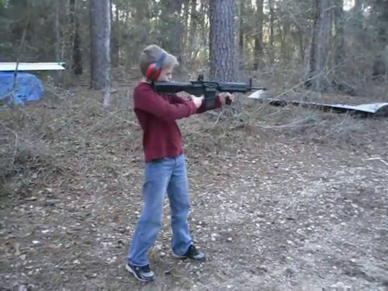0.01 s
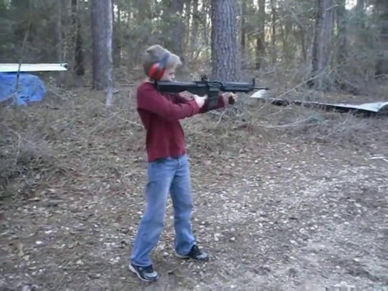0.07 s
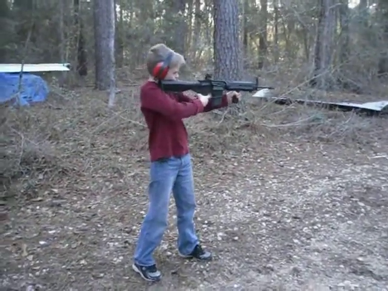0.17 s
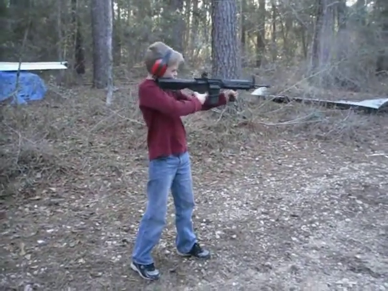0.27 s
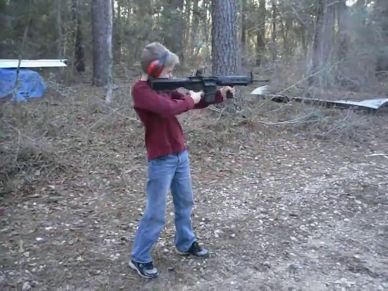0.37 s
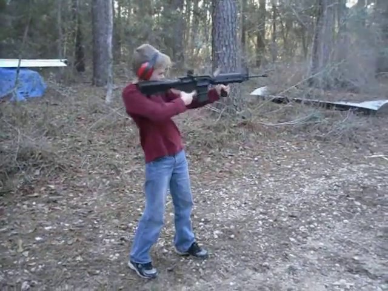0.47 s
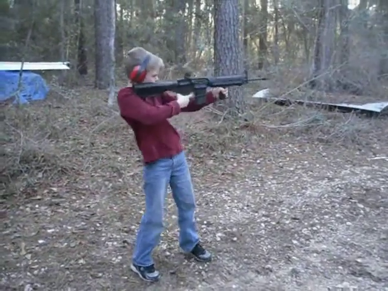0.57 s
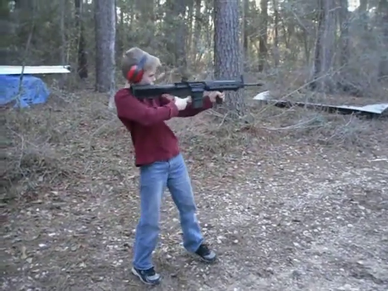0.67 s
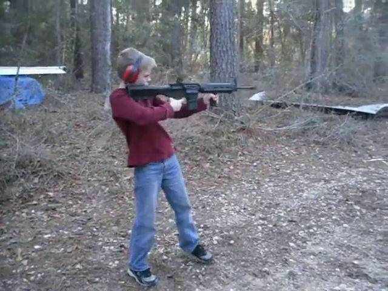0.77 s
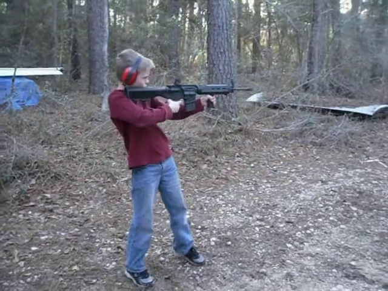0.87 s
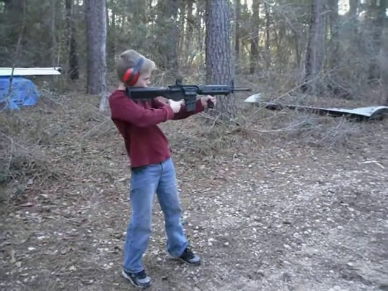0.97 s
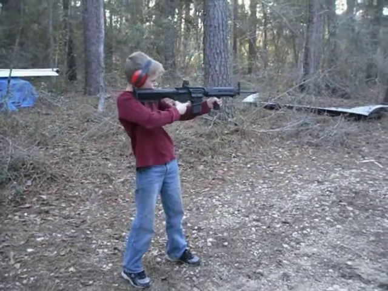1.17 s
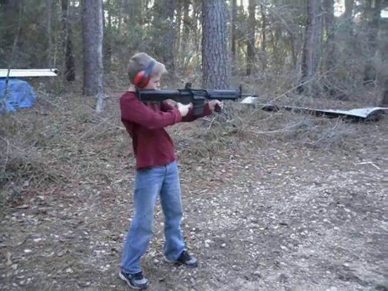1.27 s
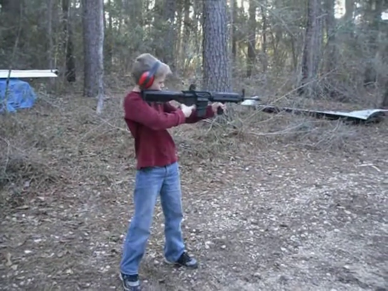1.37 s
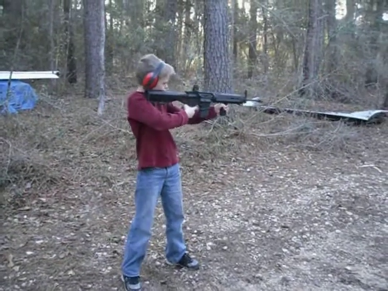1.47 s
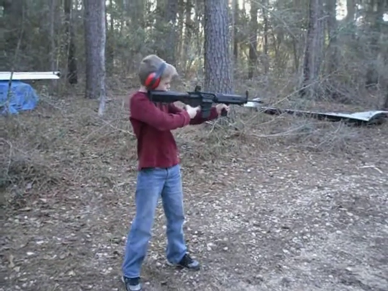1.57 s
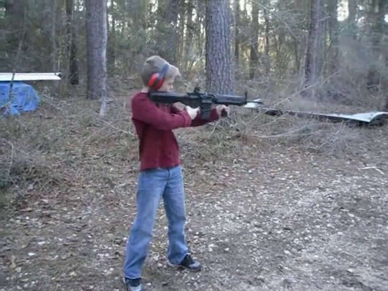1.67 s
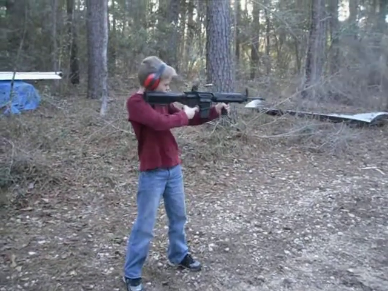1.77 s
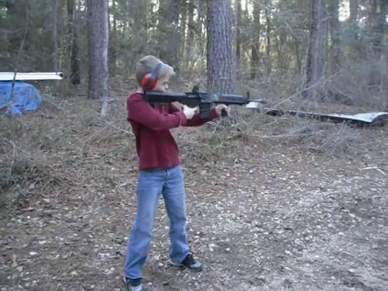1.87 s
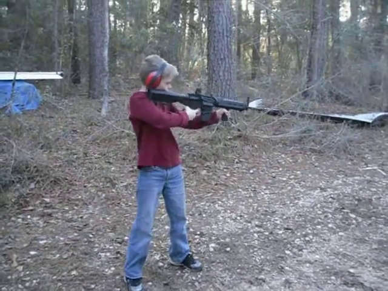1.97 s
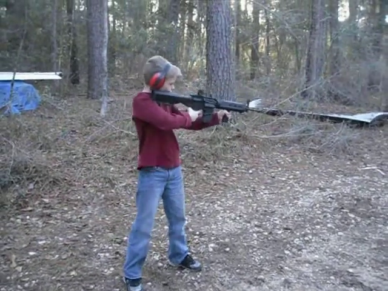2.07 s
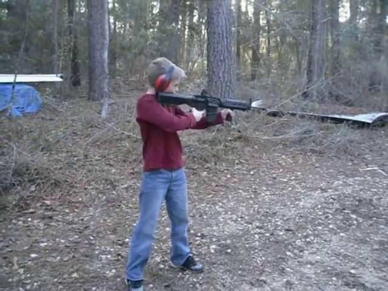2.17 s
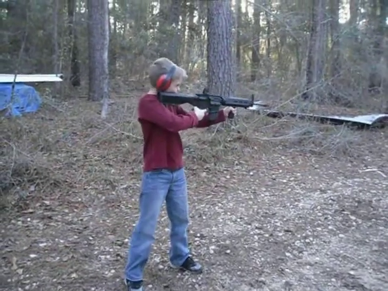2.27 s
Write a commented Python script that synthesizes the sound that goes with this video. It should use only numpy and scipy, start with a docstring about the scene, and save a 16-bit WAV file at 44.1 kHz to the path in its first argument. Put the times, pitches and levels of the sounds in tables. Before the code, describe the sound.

Close, overloaded rifle fire outdoors, three quick shots then two more, echoing away through forest

```python
"""Rifle bursts in the woods

A burst of three and a burst of two, a few metres from a small camera, while an earlier burst dies away.
Each blast is a shock pulse plus a noise puff. Ground and near trunks answer almost alike each time
with decaying noise, clicks and tuned swells; then the far forest rolls back as slowly dying noise.
Faint noise ticks (perhaps spent cases in the leaves) and two bright clacks fall in the tails, over
steady air noise. The microphone input overloads hard."""
import sys
import numpy as np
from scipy import signal
from scipy.fft import rfft, irfft, next_fast_len
from scipy.io import wavfile
from scipy.ndimage import map_coordinates

SR = 44100
rng = np.random.default_rng(int(sys.argv[2]) if len(sys.argv) > 2 else 0)


def dump_mix(stems):
    """Bounce the given channels to the path in sys.argv[1] as a 16-bit WAV at rate SR."""
    frames = np.atleast_2d(stems).T  # one column per channel
    limited = np.clip(frames, -1, 1)  # hard clip at full scale
    pcm = np.round(limited * 32767).astype(np.int16)
    wavfile.write(sys.argv[1], SR, pcm)


def gain_from_db(level_db):
    """Turn a decibel level (scalar or array-like) into a linear amplitude factor."""
    decades = np.asarray(level_db, float) / 20
    return 10 ** decades


N = 101430

# Colour tables give relative level; noise is scaled to rms 1 before its *_DB gain.
# no decay: f/Hz, T60/s
NO_DECAY_T60 = [(1, 1e9)]
# still air and preamp: f/Hz, level/dB
AIR_COLOUR = [(25, 6), (45, -3), (60, 4.5), (100, 1.5), (140, -4), (300, -4), (1000, -18), (4000, -25.5),
              (7400, -24), (12000, -41.5)]
AIR_DB = -53

# earlier burst: t/s, level/dB
EARLIER_BURST = (-1.083, 3.6)
# far forest: f/Hz, level/dB
FOREST_COLOUR = [(25, -38), (110, -11), (160, -21), (300, -10), (500, -7.5), (620, -2.5), (720, -2.5),
                 (810, -2.5), (900, -5), (1100, -10.5), (1900, -13), (3300, -14), (4300, -25.5),
                 (7220, -27.5), (12000, -45)]
# far forest decay: f/Hz, T60/s
FOREST_T60 = [(60, 1.5), (200, 2.24), (400, 3.01), (550, 3.02), (700, 2.81), (900, 2.45), (1500, 2.275),
              (3000, 1.51), (4500, 1.155), (8000, 1.01)]
FOREST_DB, FOREST_RISE_S = -10.5, 0.037
FOREST_LUMPS_DB, FOREST_SWELL_DB = 1, -1

# faint ticks: t/s, level/dB
TICK_EVENTS = [(.127, -54), (1.092, -51.5), (1.263, -48.5)]
# tick noise: f/Hz, level/dB
TICK_COLOUR = [(1500, -27), (4000, -7), (7000, -3), (12000, -29)]
TICK_T60_S = 0.029

# shots; the barrel climbs, so the far woods answer each differently: t/s, level/dB, far roll level/dB
SHOT_EVENTS = [(.2180, -2.5, -0.6), (.3090, -4, 0.4), (0.3995, -2.5, 1.54), (1.6005, -2.5, 0),
               (1.687, -4.5, -2.1)]
# escaping gas: f/Hz, level/dB
PUFF_COLOUR = [(30, -46.5), (300, -62), (1500, 14.5), (4000, 4), (7000, 7.5), (12000, -16.5), (20000, -40)]
PUFF_DB, PUFF_T60_S = 12.5, 0.033
BLAST_DB, BLAST_S = 6.5, 0.00023  # shock wave; time from peak to zero crossing
LEAD_DB, LEAD_S = -18.5, 0.0015  # weak crack just ahead of the blast

# ground and closest trunks: f/Hz, level/dB
CLOSE_COLOUR = [(25, -43), (100, -5.5), (170, -2.5), (450, -2.5), (900, -2.5), (1300, -10), (3000, -8),
                (4600, -17), (7200, -12), (12000, -35.5)]
# ground and closest trunks decay: f/Hz, T60/s
CLOSE_DECAY_T60 = [(100, 0.45), (700, 0.22), (3000, 0.21), (8000, 0.18)]
CLOSE_DB, CLOSE_RISE_S = 11.5, 0.0039
# near trunks: f/Hz, level/dB
NEAR_COLOUR = [(25, -32), (100, -10), (200, -5), (450, -1), (800, -2), (1200, -13), (3300, -16.5),
               (4300, -26.5), (7200, -20), (12000, -32)]
# near trunks decay: f/Hz, T60/s
NEAR_DECAY_T60 = [(60, 0.54), (200, 0.31), (700, 0.68), (2000, 0.65), (4500, 0.61), (8000, 0.43)]
NEAR_DB, NEAR_RISE_S, NEAR_LUMPS_DB = 8, 0.012, 2.5
REPEATED_SHARE = 0.88  # power share of the near answer common to all shots

# single trunks
TRUNKS_DB, TRUNKS_SPREAD_DB = 1.5, 6.5
TRUNKS_T60_S, TRUNKS_SPAN_S = 0.64, 0.5
TRUNK_HZ, TRUNK_DECAY_CYCLES = 2670, 0.89  # median pitch; cycles to fall by 1/e

# tuned early returns after every shot: delay t/s, f/Hz, level/dB, Gaussian width/s
EARLY_RETURNS = [(0.006, 559.7, 10, 0.0035), (0.02, 166, 3.5, 0.0085), (.043, 446.7, 9, 0.0065),
                 (0.059, 880, 1, 0.0083), (0.139, 746, -7, 0.0037), (0.194, 713, -2.5, 0.0012)]

# rough bright clacks in the first tail: t/s, level/dB
CLACK_EVENTS = [(.508, -7), (0.542, -13)]
# clack noise: f/Hz, level/dB
CLACK_COLOUR = [(1500, -30), (2500, -4.5), (3100, 1.5), (3700, -10), (6000, -15.5), (9000, -30.5)]
CLACK_T60_S = 0.06

# band limit after the input: f/Hz, gain/dB
BAND_GAIN = [(7000, 0.5), (7600, -2.5), (7900, -9), (8700, -19), (9200, -58), (10000, -100)]
BASS_CUT_HZ, TOP_HZ = 56, 16150
INPUT_TOP, INPUT_KNEE = 0.72, 5
OUT_TOP, OUT_KNEE = 0.70, 16


def along(points, hz):
    """Interpolates (f/Hz, value) points on a log frequency axis."""
    f, v = np.transpose(points)
    return np.interp(np.log(hz + 1), np.log(f + 1), v)


def wobble(rate_hz):
    """Smooth random curve with rate_hz knots a second."""
    knots = rng.standard_normal(int(N * rate_hz / SR) + 4)
    return map_coordinates(knots, [np.arange(N) * rate_hz / SR])


def age_s(start_s):
    """Time since start_s, zero before it."""
    return np.maximum(np.arange(N) / SR - start_s, 0)


def dying(start_s, colour, t60, rise_s=0.0001):
    """Coloured noise, rms 1 before its onset ramp; each frequency decays at its own rate."""
    hz, t, z = signal.stft(rng.standard_normal(N), SR, nperseg=1024)
    gain = gain_from_db(along(colour, hz))
    gain = gain / np.sqrt(np.mean(gain ** 2))
    fade = gain_from_db(-60 * np.maximum(t - start_s, 0) / along(t60, hz)[:, None])
    noise = signal.istft(z * gain[:, None] * fade, SR, nperseg=1024)[1][:N]
    return noise * (1 - np.exp(-age_s(start_s) / rise_s))


def burst(start_s, colour, t60_s):
    """Short puff of coloured noise; all frequencies decay together."""
    return dying(start_s, colour, NO_DECAY_T60) * gain_from_db(-60 * age_s(start_s) / t60_s)


def still_air():
    """Steady coloured noise of air and preamp."""
    return gain_from_db(AIR_DB) * dying(-1, AIR_COLOUR, NO_DECAY_T60)


def forest(start_s):
    """Far woods scatter the blast into a slow roll with random lumps and swells."""
    lumps_db = FOREST_LUMPS_DB * wobble(60)
    swell_db = FOREST_SWELL_DB * wobble(11.53)
    roll = dying(start_s, FOREST_COLOUR, FOREST_T60, FOREST_RISE_S)
    return gain_from_db(FOREST_DB + lumps_db + swell_db) * roll


def ticks():
    """Faint ticks, each a short decaying noise puff."""
    return sum(gain_from_db(db) * burst(s, TICK_COLOUR, TICK_T60_S) for s, db in TICK_EVENTS)


def muzzle(start_s):
    """Shock pulse with overpressure then suction, escaping gas noise, and a weak crack ahead."""
    lead = gain_from_db(LEAD_DB) * burst(start_s - LEAD_S, PUFF_COLOUR, PUFF_T60_S)
    u = age_s(start_s) / BLAST_S
    shock = gain_from_db(BLAST_DB) * (u > 0) * (1 - u) * np.exp(-u)
    puff = gain_from_db(PUFF_DB) * burst(start_s, PUFF_COLOUR, PUFF_T60_S)
    return lead + shock + puff


def trunks(count=260):
    """Single trunks return sharp damped clicks of scattered pitch, weaker the farther the trunk."""
    delay_s = rng.random(count) * TRUNKS_SPAN_S
    log_pitch = rng.normal(0, 0.42, count)
    size = rng.uniform(-0.86, 1, count)
    sample = np.arange(256)
    t = sample / SR
    hz = TRUNK_HZ * np.exp(log_pitch)[:, None]
    gain = gain_from_db(TRUNKS_DB + TRUNKS_SPREAD_DB * size - 60 * delay_s / TRUNKS_T60_S)[:, None]
    clicks = gain * np.sin(2 * np.pi * hz * t) * np.exp(-t * hz / TRUNK_DECAY_CYCLES)
    place = (delay_s * SR).astype(int)[:, None] + sample
    return np.bincount(place.ravel(), clicks.ravel(), N)[:N]


def nearby():
    """Ground and near trunks answer a blast at time zero with lumpy decaying noise and clicks."""
    close = gain_from_db(CLOSE_DB) * dying(0, CLOSE_COLOUR, CLOSE_DECAY_T60, CLOSE_RISE_S)
    near = gain_from_db(NEAR_DB) * dying(0, NEAR_COLOUR, NEAR_DECAY_T60, NEAR_RISE_S)
    lumps = gain_from_db(NEAR_LUMPS_DB * wobble(149.8))
    return trunks() + lumps * (close + near)


def returns():
    """Tuned early returns: sines under Gaussian swells at fixed delays."""
    t = np.arange(N) / SR
    total = np.zeros(N)
    for delay_s, hz, db, width_s in EARLY_RETURNS:
        swell = np.exp(-0.5 * ((t - delay_s) / width_s) ** 2)
        total += gain_from_db(db) * swell * np.sin(2 * np.pi * (hz * t + rng.random()))
    return total


def clacks():
    """Rough bright clacks, each a decaying noise puff."""
    return sum(gain_from_db(db) * burst(s, CLACK_COLOUR, CLACK_T60_S) for s, db in CLACK_EVENTS)


def scene():
    """Sums air, earlier burst, ticks, shots with their echoes, and clacks."""
    repeated = np.sqrt(REPEATED_SHARE) * nearby() + returns()
    shots = np.zeros(N)
    for start_s, db, far_db in SHOT_EVENTS:
        answer = repeated + np.sqrt(1 - REPEATED_SHARE) * nearby()
        answer = np.pad(answer, (round(start_s * SR), 0))[:N]
        shots += gain_from_db(db) * (muzzle(start_s) + answer + gain_from_db(far_db) * forest(start_s))
    earlier_s, earlier_db = EARLIER_BURST
    earlier = gain_from_db(earlier_db) * forest(earlier_s)
    return (still_air() + earlier + ticks() + shots + clacks())[None]


def clip(x, top, knee):
    """Overload with a rounded corner; a higher knee is sharper."""
    return x / (1 + np.abs(x / top) ** knee) ** (1 / knee)


def band_limit(x):
    """Steep zero-phase band limit by spectral gain."""
    m = next_fast_len(N + 8192)
    gain = gain_from_db(along(BAND_GAIN, np.fft.rfftfreq(m, 1 / SR)))
    return irfft(rfft(x, m) * gain, m)[..., :N]


def top_cut(x):
    """Nothing passes above the cut-off."""
    return signal.sosfilt(signal.butter(12, 16630, fs=SR, output="sos"), x)


def record(dry):
    """Capsule bass loss, input overload, band limit, output overload, then a steep low-pass."""
    bass_cut = signal.butter(3, BASS_CUT_HZ, "high", fs=SR, output="sos")
    capsule = signal.sosfilt(bass_cut, dry)
    limited = band_limit(clip(capsule, INPUT_TOP, INPUT_KNEE))
    low_pass = signal.cheby2(20, 40, TOP_HZ, fs=SR, output="sos")
    mix = signal.sosfiltfilt(low_pass, clip(limited, OUT_TOP, OUT_KNEE))
    return top_cut(mix)


dry = scene()
out = record(dry)
dump_mix(out)
```